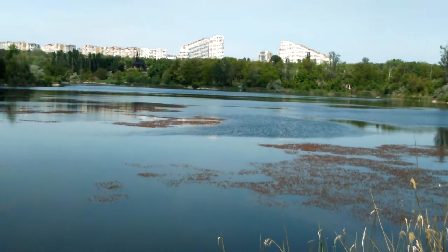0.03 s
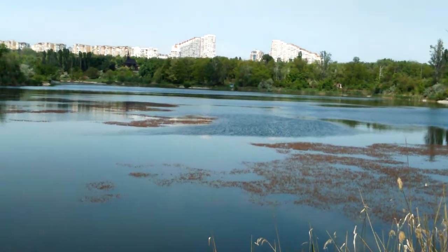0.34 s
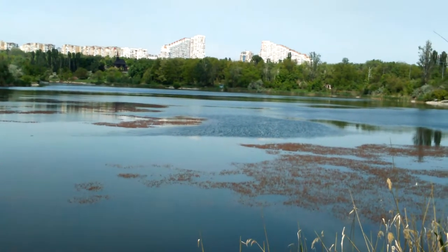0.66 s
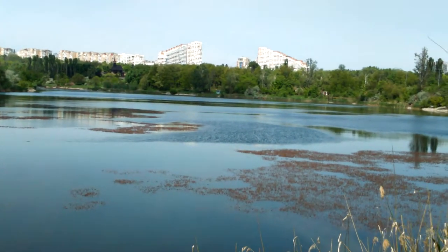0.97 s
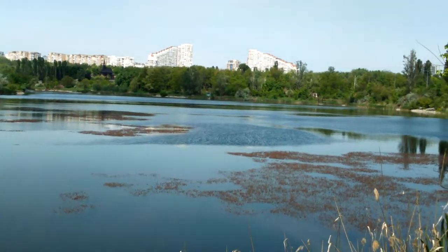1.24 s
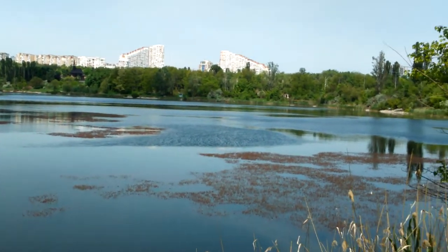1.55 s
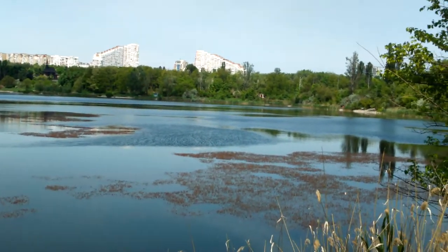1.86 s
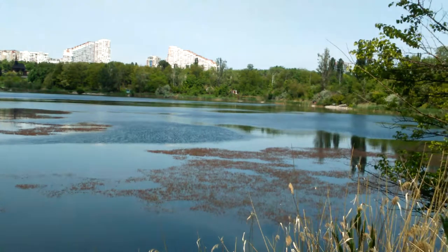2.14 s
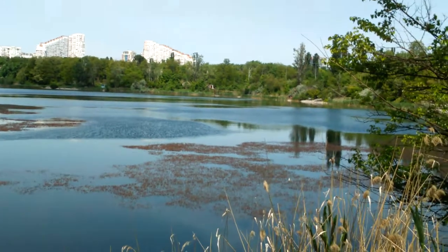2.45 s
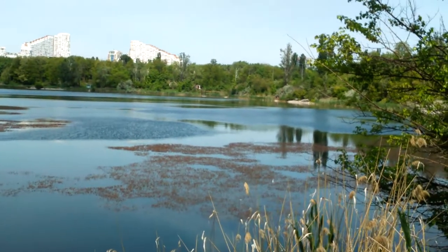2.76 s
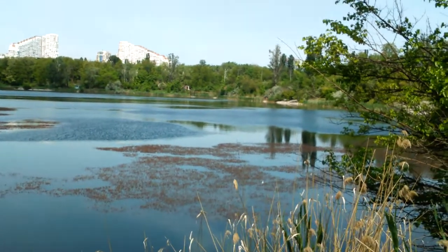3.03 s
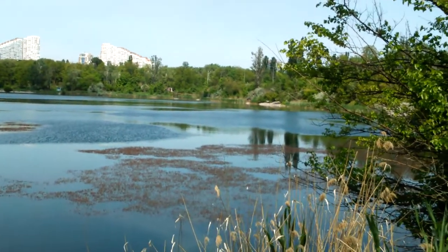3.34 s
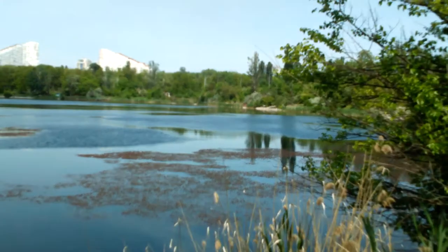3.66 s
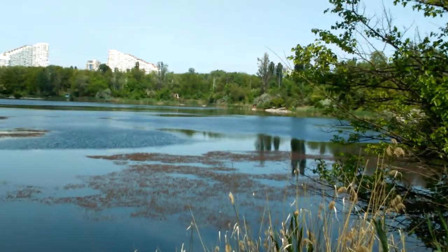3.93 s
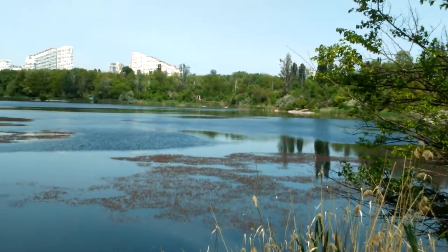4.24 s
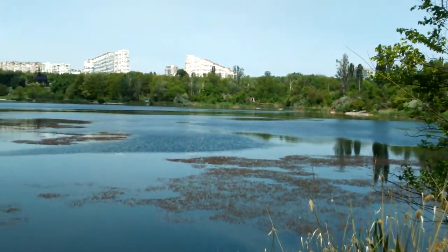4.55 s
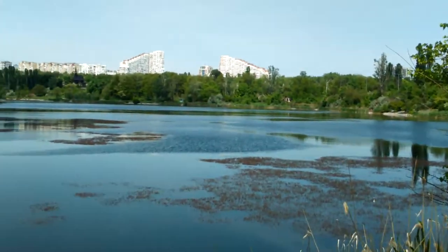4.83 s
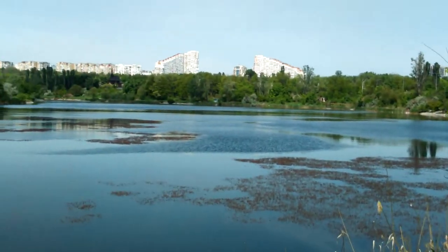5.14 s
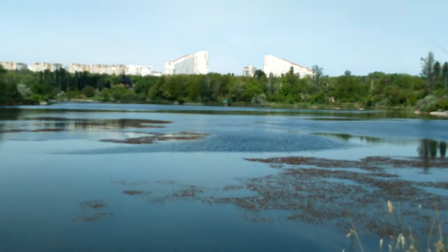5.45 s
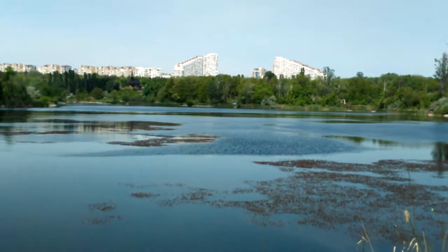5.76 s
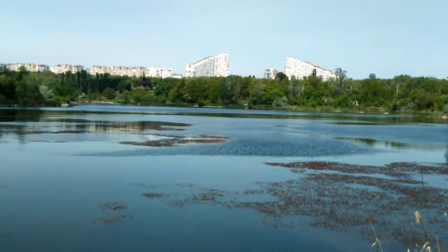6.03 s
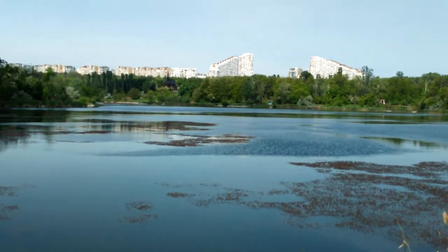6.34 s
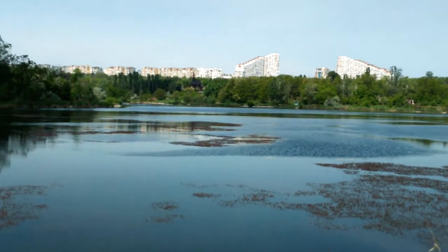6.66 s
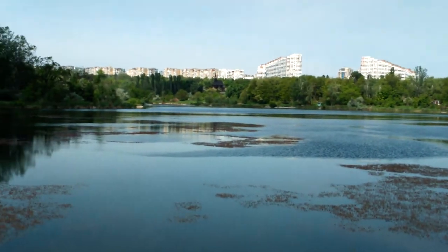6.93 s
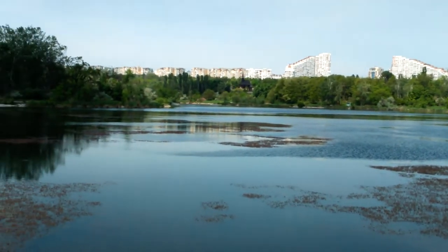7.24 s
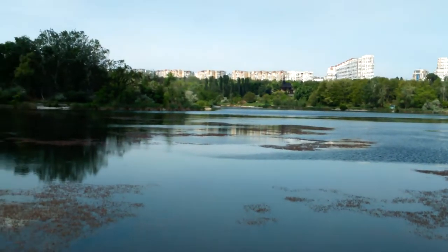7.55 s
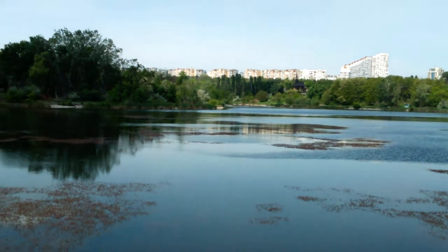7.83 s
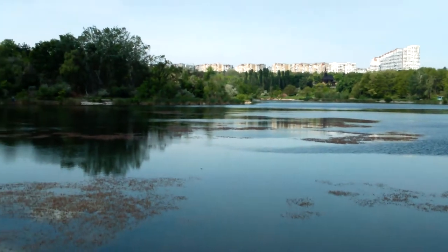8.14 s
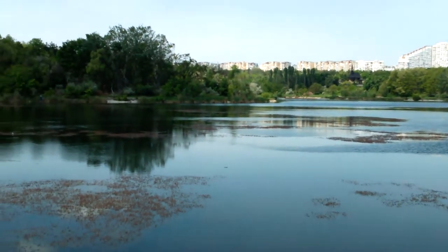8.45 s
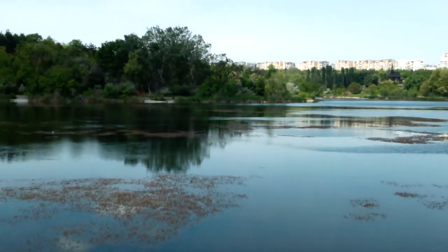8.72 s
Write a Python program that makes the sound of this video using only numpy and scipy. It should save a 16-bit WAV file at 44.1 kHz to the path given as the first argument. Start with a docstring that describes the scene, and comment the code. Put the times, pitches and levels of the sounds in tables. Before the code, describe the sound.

Many frogs cackle in overlapping bursts, near and far, beside a lake, over soft hiss and a low rumble of breeze on the microphone.

```python
"""The reedy shore of a lake: marsh frogs cackle near and far, their series of short croaks overlapping.
Each croak is a buzz of the vocal cords that slides down and breaks up, rung by the vocal sacs; the banks
echo it. Peeps, longer quacks and a small frog's thin rasps fall in between. Behind them lie a distant
chorus, the drone of a town and a soft hiss; a breeze buffets the microphone."""
import sys
import numpy as np
from scipy import signal
from scipy.fft import rfft, irfft
from scipy.io import wavfile

SR = 44100
rng = np.random.default_rng(int(sys.argv[2]) if len(sys.argv) > 2 else 0)


def materialize(psi):
    """Save the field psi as 16-bit PCM at rate SR to the path in sys.argv[1].

    A 1-D psi becomes a single channel; in a 2-D psi each row is a channel.
    """
    bounded = np.clip(np.atleast_2d(psi).T, -1, 1)
    quanta = np.round(bounded * 32767).astype(np.int16)
    wavfile.write(sys.argv[1], SR, quanta)


N = 396459
TIME = np.arange(N) / SR
TOP_HZ = 15700
# the distant chorus drops back for a moment before the last outburst (0-1)
LULL = np.exp(-((TIME - 8.32) / 0.28) ** 2)


def undb(db):
    """Decibels to gain."""
    return 10 ** (np.asarray(db) / 20)


def unit(x):
    """Scale to rms 1."""
    return x / np.sqrt(np.mean(x ** 2))


def add(out, s, x):
    """Mix x into out from time s."""
    i = max(int(s * SR), 0)
    out[i:i + len(x)] += x[:max(len(out) - i, 0)]


def wander(t, rate):
    """Random drift: rate values a second, joined by lines."""
    return np.interp(t * rate, np.arange(4096), rng.standard_normal(4096))


def noise(points):
    """Noise of rms 1, coloured by (frequency [Hz], level [dB]) points and rolled off beyond them."""
    hz, db = np.transpose(points)
    f = np.maximum(np.arange(N // 2 + 1) * SR / N, 1)
    edges = 1 / (1 + (hz[0] / f / 2) ** 4) / (1 + (f / hz[-1] / 2) ** 4)
    colour = undb(np.interp(np.log(f), np.log(hz), db))
    return unit(irfft(rfft(rng.standard_normal(N)) * edges * colour, N))


def resonance(f, hz, width):
    """Complex response at f of a ringing resonance, 1 at its centre."""
    return 1 / (1 + 1j * (f / hz - hz / f) * hz / width)


def background(drone_db=-38, shore_db=-50, hiss_trim_db=2, lull_db=-4):
    """The bed: the town's low drone, the blurred murmur of the far shore and a soft hiss."""
    # colours of the three noises: (frequency [Hz], relative level [dB])
    drone_colour = [(20, -26), (33, -21.5), (43, -4), (51, 5), (60, -7), (90, -15.5), (160, -33),
                    (300, -42)]
    shore_colour = [(150, -17.5), (300, -0.5), (410, 2.5), (580, -5.5), (750, -1.5), (950, -4), (1400, -4),
                    (2000, 1), (2600, -9.5), (3600, -17), (5000, -25), (8000, -37.5)]
    hiss_colour = [(1000, 11.5), (3000, -14.5), (5200, -0.5), (6400, 2.5), (8000, -2.5), (10500, -6.5),
                   (12500, -9.5), (15500, -10)]
    # slow fader ride on the hiss: (time [s], level [dB])
    hiss_ride = [(0.0, -62.5), (2.0, -64), (8.99, -61)]
    drone = noise(drone_colour) * undb(drone_db)
    shore = noise(shore_colour) * undb(shore_db + wander(TIME, 9) + lull_db * LULL)
    hiss = noise(hiss_colour) * undb(np.interp(TIME, *np.transpose(hiss_ride)) + hiss_trim_db)
    return drone + shore + hiss


def breeze(gust_trim_db=-1, flutter_db=1, bump_trim_db=1, bump_s=.0071, swirl_db=-8, swirl_s=.021):
    """Gusts rumble and flutter on the microphone; eddies hit it with short bumps in a swirl of noise."""
    # swell of the gusts: (time [s], level [dB])
    gusts = [(0.0, -38), (0.05, -38), (0.12, -43), (0.3, -30.5), (0.4, -42), (1.08, -35.5), (1.1, -30),
             (1.23, -45), (1.28, -32), (1.35, -39), (1.45, -29), (1.5, -37.5), (2.05, -31), (2.13, -38.5),
             (2.43, -30), (2.73, -38.5), (2.85, -29.5), (3.73, -41.5), (3.78, -31), (3.83, -32),
             (4.58, -34), (4.63, -36), (5.03, -33.5), (5.41, -36.5), (5.56, -29.5), (5.61, -38),
             (5.71, -32.5), (5.83, -39), (6.66, -42), (6.68, -31.5), (6.74, -38), (6.89, -26), (6.93, -47),
             (7.06, -31), (7.68, -37.5), (7.76, -28.5), (7.94, -37.5), (8.29, -39.5), (8.31, -33),
             (8.41, -47), (8.46, -35), (8.71, -33.5), (8.94, -44), (8.99, -29)]
    # colours of the rumble and the swirl: (frequency [Hz], relative level [dB])
    rumble_colour = [(35, -27.5), (50, 0.5), (70, 2), (100, -3.5), (140, -10.5), (200, -20), (300, -31),
                     (500, -60)]
    swirl_colour = [(70, -33.5), (120, -3), (170, 10), (230, -0.5), (310, -10), (450, -24.5), (900, -50)]
    # eddies hitting the microphone: (time [s], level [dB], pitch [Hz])
    bumps = [(0.855, -33, 167), (1.135, -33.4, 139), (1.751, -30.5, 150), (1.973, -35.5, 137),
             (2.036, -35, 132), (2.373, -33, 154), (2.456, -35, 154), (2.507, -32, 140), (2.979, -33, 149),
             (3.045, -32.3, 185), (4.001, -27, 200), (4.12, -33, 205), (4.857, -30.5, 160),
             (4.993, -31.5, 158), (5.34, -29.5, 200), (6.871, -34.5, 143), (7.245, -32.5, 154),
             (7.296, -33.5, 152), (7.757, -34, 154)]
    gust_db = np.interp(TIME, *np.transpose(gusts)) + gust_trim_db
    buffet = noise(rumble_colour) * undb(gust_db + flutter_db * wander(TIME, 10))
    t = TIME[:SR // 10] - .05
    bump_envelope = np.hanning(len(t)) / (1 + (t / bump_s) ** 2)
    for s, db, hz in bumps:
        bump = np.cos(2 * np.pi * (hz * t + rng.random())) * bump_envelope
        add(buffet, s + t[0], undb(db + bump_trim_db) * bump)
    swirl = sum(undb(db + swirl_db) / (1 + ((TIME - s) / swirl_s) ** 2) for s, db, _ in bumps)
    return buffet + noise(swirl_colour) * swirl


def banks(x, reeds_db=-13, reeds_t60=.19, trees_db=-15, trees_t60=.7, dull_hz=2500):
    """The reed bed scatters the calls, and the trees return a long, duller tail."""
    t = TIME[:SR]
    reeds, trees = rng.standard_normal((2, SR))
    reeds = reeds * undb(-60 * t / reeds_t60) * (1 - np.exp(-t / .007))
    trees = trees * undb(-60 * t / trees_t60) * (1 - np.exp(-t / .15))
    trees = signal.sosfilt(signal.butter(2, dull_hz, fs=SR, output="sos"), unit(trees))
    response = undb(reeds_db) * unit(reeds) + undb(trees_db) * trees
    return signal.fftconvolve(x, response / np.sqrt(SR))[:N]


def stems(x, scatter_db=-5, spread_s=.002):
    """Stems round a frog blur its pulses, differently for every call."""
    t = TIME[:1024]
    scatter = unit(rng.standard_normal(len(t)) * t * np.exp(-t / spread_s))
    response = undb(scatter_db) * scatter / np.sqrt(len(t))
    response[0] = 1  # the direct path
    return signal.fftconvolve(x, response)


def cords(t, pitch, rough, jitter=.055, shimmer=.3):
    """Pulses of the vocal cords, all harmonics equally strong; uneven cycles roughen them."""
    cycles = np.cumsum(pitch * (1 + jitter * rough * wander(t, 448))) / SR
    order = np.arange(1, 31)[:, None]
    pulses = np.sum((order * pitch < TOP_HZ) * np.cos(2 * np.pi * order * cycles), axis=0)
    return pulses * (1 + shimmer * rough * wander(t, 312))


def throat(pulses, sac_hz, body_db, mouth_db, mouth_hz,
           overtone_db=-30, lower_sac_db=-24, belly_db=-12, sac_share=1):
    """The pulses ring the vocal sacs, two body resonances below and two mouth resonances above."""
    size = 8192
    f = np.maximum(np.arange(size // 2 + 1) * SR / size, 1)
    hollow = 1 - .4 * resonance(f, 1565, 125)  # a scoop between the sacs' low and high ringing
    main_sac = resonance(f, sac_hz, 250) * resonance(f, sac_hz, 1020) * hollow
    lower_sac = undb(lower_sac_db) * resonance(f, 1730, 190) * resonance(f, 1730, 1020)
    skirt = 1 / np.sqrt(1 + (f / sac_hz / 1.17) ** 16)  # the sacs pass little above their own pitch
    rasp = undb(-23.5) * resonance(f, 2760, 800) ** 2
    sacs = (main_sac - lower_sac) * skirt - rasp
    belly = undb(belly_db) * resonance(f, 437, 240) ** 2
    body = resonance(f, 1046, 290) * resonance(f, 1046, 520) + belly
    lower_mouth = undb(-1) * resonance(f, .835 * mouth_hz, 425) ** 2
    mouth = resonance(f, mouth_hz, 340) ** 2 + lower_mouth
    # above the mouth resonances only one faint overtone gets out
    ceiling = 1 / (1 + (f / mouth_hz / 1.12) ** 20)
    overtone = undb(overtone_db) * resonance(f, 10400, 1700) ** 3
    source = rfft(stems(pulses), size)

    def ring(response):
        return unit(irfft(source * response, size)) * np.sqrt(len(pulses) / size)

    return (sac_share * ring(sacs * ceiling)
            + undb(body_db) * ring(body * ceiling)
            + undb(mouth_db) * ring(mouth * ceiling + overtone))


def croak(length, pitch_hz, glide, rough_end, tone_db, sac_hz, body_db, mouth_db, mouth_hz,
          whistle_db=-20, peak_skew=.52, rough_start=.2, **timbre):
    """One push of air: the cords slacken and roughen; the sacs sing under a thin, falling whistle."""
    t = np.arange(int(length * SR)) / SR
    progress = t / t[-1]
    slack_octaves = .25 * np.maximum(progress - 1 / 3, 0)
    pitch = pitch_hz * 2 ** (glide * (t - t[-1] / 4) - slack_octaves)
    rough = rough_start + (rough_end - rough_start) * progress ** 1.5
    # the air comes in a few quick puffs within each croak
    rattle = 1 + .25 * np.cos(2 * np.pi * 103 * rng.uniform(.6, 1.1) * t)
    push = np.abs(np.sin(np.pi * progress ** peak_skew)) ** 1.6 * rattle
    arch = 1 - .07 * (4 * (progress - .4) ** 2 - .1)
    tone_hz = sac_hz * (arch + .025 * rough * wander(t, 403))
    tone = undb(tone_db) * unit(push * np.sin(2 * np.pi * np.cumsum(tone_hz) / SR))
    whistle_hz = mouth_hz * 2 ** (-1.8 * (t - t[-1] / 3)) * (1 + .012 * wander(t, 400))
    whistle = unit(np.sqrt(push) * np.sin(2 * np.pi * np.cumsum(whistle_hz) / SR))
    # equal-power blends: buzz with tone in the sacs, buzz with whistle in the mouth
    sac_share = 1 / np.hypot(1, undb(tone_db))
    buzz_db = mouth_db - 20 * np.log10(np.hypot(1, undb(whistle_db)))
    pulses = push * cords(t, pitch, rough)
    voice = throat(pulses, sac_hz, body_db, buzz_db, mouth_hz, sac_share=sac_share, **timbre)
    add(voice, 0, sac_share * tone + undb(buzz_db + whistle_db) * whistle)
    return voice


def far_frogs(count=36, nearest_db=-50.5, spread_db=4.5, lull_db=-9):
    """Frogs across the water take turns, each swelling and fading through seven croaks of its own."""
    out = np.zeros(N)
    duration = N / SR
    for turn, (start, height, slowness, near) in enumerate(rng.random((count, 4))):
        note = croak(length=.076, pitch_hz=380 + 150 * height, glide=-11, rough_end=1.62, tone_db=-4,
                     sac_hz=1150 + 900 * height, body_db=-8, mouth_db=-25, mouth_hz=4700)
        onset = (turn + start) / count * duration
        gap = .088 * (.78 + .37 * slowness)
        gain = undb(nearest_db + spread_db * (near - 1))
        for k, swell in enumerate(np.hanning(9)[1:-1]):
            add(out, (onset + k * gap) % duration, note * swell * gain)
    return out * undb(lull_db * LULL)


def rasps():
    """A small frog keeps up even series of thin, high croaks, rough from the start."""
    # its series: (start [s], gap [s], count, level [dB], sac resonance [Hz])
    series = [(.073, .0872, 9, -52, 2585), (1.291, .101, 5, -54.5, 2605), (1.991, .091, 3, -52, 2610),
              (2.258, .0888, 4, -51, 2675), (5.766, .102, 2, -52, 2255), (6.841, .099, 5, -57, 2705)]
    out = np.zeros(N)
    for start, gap, count, db, sac_hz in series:
        for k in range(count):
            note = croak(length=.05, pitch_hz=530, glide=-7, rough_end=2.8, tone_db=-8, sac_hz=sac_hz,
                         body_db=-24, mouth_db=-24, mouth_hz=3900, rough_start=1.2, peak_skew=.8)
            add(out, start + k * gap, undb(db) * note)
    return out


def quacks(arch_octaves=.2975, trim_db=-.5):
    """Drawn-out, grainy calls: the pitch of the cords rises and falls with the push of air."""
    # quacks: (time [s], length [s], level [dB], top pitch [Hz], sac resonance [Hz],
    # body resonance [dB], mouth resonances [dB])
    calls = [(.084, .076, -41.2, 412, 1215, -7.5, -27.5), (.134, .062, -42.3, 468, 1505, -5.5, -19.5),
             (1.093, .047, -37.4, 432, 1255, -10.5, -28.5), (1.141, .046, -42.4, 442, 1755, -1.5, -23.5),
             (1.186, .074, -42.2, 392, 1945, -4.5, -26.5), (2.617, .073, -34.3, 456, 1900, -5, -23),
             (2.701, .044, -37.2, 462, 1425, -6.6, -24.5), (2.749, .041, -39.3, 422, 1705, -8.5, -27.6)]
    out = np.zeros(N)
    for s, length, db, pitch, sac_hz, body_db, mouth_db in calls:
        t = np.arange(int(length * SR)) / SR
        push = np.sqrt(np.sin(np.pi * t / length))
        pulses = push * cords(t, pitch * 2 ** (arch_octaves * (push ** 2 - 1)), rough=1.5)
        note = throat(pulses, sac_hz, body_db, mouth_db, mouth_hz=4750, belly_db=-6)
        add(out, s, undb(db + trim_db) * note)
    return out


def peep(hz, length=.028, octaves_per_s=-5, octave_db=-21):
    """A short, nearly pure note of the sacs that sags a little."""
    t = np.arange(int(length * SR)) / SR - length / 2
    phase = 2 * np.pi * np.cumsum(hz * 2 ** (octaves_per_s * t)) / SR
    return np.hanning(len(t)) * (np.sin(phase) + undb(octave_db) * np.sin(2 * phase))


def cackles(croak_trim_db=-.3, peep_trim_db=-1, full_sac_hz=2090, pitch_scatter=.018, glide_scatter=.18):
    """The croaks and peeps of the nearer frogs; returns the direct sound and the send to the banks."""
    # each frog's voice: (croak length [s], usual pitch [Hz], usual glide [octaves/s], final roughness,
    # pure sac tone [dB], mouth resonance on full sacs [Hz], overtone [dB], lower sac resonance [dB],
    # whistle over the mouth's buzz [dB], echo send [dB])
    voices = {"near": (.047, 519, -20, 1.7, -5, 4860, -23, -11, -11, -3),
              "throaty": (.049, 495, -21, 1.6, -3, 4800, -35, -12, -18, -1),
              "middle": (.048, 525, -10, 1.5, 1.5, 4450, -36, -24, -10, -1),
              "hoarse": (.06, 485, -12, 2.4, -5, 4520, -36, -14, -7, 2),
              "husky": (.063, 445, -15, 2.1, -6, 4200, -36, -24, -9, 0),
              "clear": (.043, 575, -5, 1.6, 1, 4950, -35, -24, -15, -1),
              "deep": (.056, 470, -12, 2.2, -3, 4190, -38, -13, 0, 0)}
    # each frog's croaks; a series tends to slow, sink and fade as the frog tires:
    # (time [s], level [dB], sac resonance [Hz], body resonance [dB], mouth resonances [dB])
    croaks = {"near": [(4.822, -32.5, 2030, -13.5, -20), (4.888, -31.75, 2073, -13, -18.5),
              (4.969, -28.55, 2043, -16, -20.5), (5.057, -28.75, 1673, -14, -29),
              (5.137, -37.75, 1813, -6.6, -25.3), (6.14, -30.65, 2093, -17, -21),
              (6.213, -28.35, 2183, -19, -21.5), (6.296, -27.8, 1743, -18, -27),
              (6.389, -31.3, 1663, -15, -27.5), (7.365, -30.35, 2123, -17, -22.5),
              (7.44, -26.3, 2173, -21.5, -24), (7.523, -28.8, 2083, -18.5, -21.5),
              (7.615, -28.75, 1713, -15, -28), (8.685, -30.8, 2133, -17, -25.5),
              (8.764, -29.65, 2223, -19, -23), (8.849, -31, 1893, -17, -23), (8.94, -30.8, 1743, -15, -27)],
              "throaty": [(3.668, -32.3, 1963, -13.6, -24.8), (3.73, -29.95, 1983, -13.6, -25.8),
              (3.806, -35.95, 1783, -5.6, -23.8), (3.885, -39.95, 1773, -0.6, -23.8)],
              "middle": [(0.159, -39.55, 1953, -6.6, -18.8), (0.229, -36.2, 2143, -18, -18.5),
              (0.315, -35.15, 2153, -16, -18), (0.399, -39.15, 2063, -20.6, -14.8),
              (0.482, -46.85, 1753, -12.6, -12.8), (1.381, -42.55, 2103, -10.6, -16.8),
              (1.46, -36.05, 2103, -20.6, -19.8), (1.545, -37.45, 2033, -23.6, -20.8),
              (1.631, -38.65, 1913, -9.6, -20.8), (1.717, -47.95, 1773, -4.6, -15.8),
              (2.802, -39.95, 2023, -13.6, -20.8), (2.883, -35.55, 2103, -22.6, -23.8),
              (2.965, -33.95, 2183, -27.6, -22.8), (3.049, -37.45, 2003, -4.6, -19.8),
              (4.011, -41.45, 2063, -16.6, -17.8), (4.094, -36.25, 2113, -20.6, -18.8),
              (4.178, -34.25, 2063, -9, -20.8), (4.269, -38.95, 2073, -6, -16), (4.359, -45, 1863, -5, -14),
              (8.725, -42, 2000, -16, -22), (8.81, -43, 2030, -16, -18), (8.917, -39, 2100, -16, -17)],
              "hoarse": [(5.22, -39.85, 1983, -15.6, -15.8), (5.301, -37.05, 2083, -13.6, -15.8),
              (5.384, -38, 2100, -14, -15), (5.468, -37.5, 2040, -14, -15), (6.483, -40, 2040, -14, -17.5),
              (6.566, -38, 2000, -16, -18), (6.656, -40, 1950, -14, -18), (7.686, -39, 1900, -8, -17),
              (7.75, -37.5, 2090, -15, -17), (7.83, -38.5, 2093, -14, -16), (7.914, -41, 1963, -11, -16),
              (8.003, -46, 1700, -12, -15)], "husky": [(0.544, -43.55, 1653, -4.6, -21.8),
              (0.631, -39.65, 1783, -4.6, -19.8), (0.719, -40.35, 1713, -6.6, -17.8),
              (0.802, -42.05, 1173, -16.6, -22.8), (1.944, -38.75, 1753, -5.5, -20.5),
              (2.027, -39.5, 1800, -12, -20), (2.116, -37.85, 1803, -7, -23),
              (2.202, -36.75, 1753, -11, -25.8), (3.193, -38, 1773, -9, -21),
              (3.278, -36.5, 1733, -10, -21), (4.459, -41.05, 1783, -7.6, -17.8),
              (4.552, -39.75, 1663, -16.6, -19.8)], "clear": [(0.912, -39.65, 1833, -14.6, -21.8),
              (0.995, -34.65, 1853, -10.6, -28.8), (1.076, -37.25, 1743, -7, -27.8),
              (1.314, -47.15, 1653, -3.6, -25.8), (1.884, -43.75, 1693, -10.6, -25.8),
              (3.384, -40.65, 1793, -10.6, -23.8), (3.466, -40.55, 1723, -10.6, -19.8),
              (3.552, -35.3, 1793, -23.6, -29.8), (4.604, -40.65, 2153, -12.6, -25.8),
              (4.679, -41.65, 2093, -9.6, -21.8), (4.769, -37.95, 1753, -22.6, -26.8),
              (7.074, -51.75, 1723, -12.6, -19.8), (7.175, -46.75, 1643, -16.6, -23.8),
              (7.273, -44.65, 1613, -19.6, -23.8), (8.539, -46.95, 2053, -13.6, -21.8),
              (8.624, -41.65, 2103, -19.6, -22.8)], "deep": [(0.364, -49.55, 1393, -11.6, -22.8),
              (0.956, -46.85, 1343, -17.6, -22.8), (1.624, -47.35, 1543, -8.6, -22.8),
              (1.943, -43, 1230, -8, -26), (2.033, -40.5, 1400, -14, -24), (3.135, -38.5, 1460, -10, -17),
              (3.217, -40.35, 1373, -12, -17), (3.307, -42.15, 1153, -31.6, -19),
              (4.192, -43.35, 1413, -7.6, -22.8), (4.277, -40.65, 1393, -10.6, -22.8),
              (4.366, -41.5, 1410, -12, -20), (4.659, -46.25, 1353, -14.6, -22.8),
              (5.364, -41.85, 1403, -7.6, -22.8), (5.446, -39.5, 1453, -9.6, -20),
              (5.538, -39, 1423, -12, -17), (5.624, -46.5, 1413, -3, -18), (6.462, -39.5, 1793, -7, -25),
              (6.546, -40, 1470, -6, -22), (6.629, -39.5, 1493, -9, -18), (6.717, -38.5, 1430, -12, -14),
              (6.791, -40.5, 1683, -7, -15), (6.876, -48, 1633, -9, -22),
              (6.924, -49.65, 1413, -10.6, -22.8), (6.974, -47.75, 1653, -14.6, -25.8),
              (7.704, -40, 1480, -6, -14), (7.786, -37, 1423, -14, -17), (7.866, -42, 1433, -8, -15),
              (7.942, -44, 1640, -13, -18), (8.234, -51.05, 1513, -11.6, -23.8),
              (8.279, -47.95, 1433, -15.6, -26.8), (8.325, -46.75, 1653, -13.6, -26.8),
              (8.722, -41, 1450, -7, -21), (8.808, -39, 1483, -11, -16), (8.896, -39, 1443, -12, -15),
              (8.972, -42, 1450, -11, -17)]}
    # peeps of full sacs just before the cords open: (time [s], level [dB], pitch [Hz])
    peeps = [(.197, -33.5, 1865), (2.836, -34.5, 2005), (2.929, -37.5, 1855), (3.641, -35.5, 1655),
             (3.713, -35.4, 1985), (3.941, -40.5, 1565), (3.976, -36.5, 1955), (4.067, -33.2, 2010),
             (4.151, -37.6, 1605), (4.857, -32.5, 1620), (4.873, -28.5, 1925), (4.96, -29, 1935),
             (5.334, -32, 2010), (6.194, -28.6, 2105), (7.509, -30.4, 1995), (8.753, -30.6, 2055)]
    direct, send = np.zeros((2, N))
    for frog, rows in croaks.items():
        (length, pitch, glide, rough, tone_db, mouth_hz,
         overtone_db, lower_sac_db, whistle_db, echo_db) = voices[frog]
        for s, db, sac_hz, body_db, mouth_db in rows:
            # the cords lock one of their harmonics onto the sac resonance
            locked_hz = sac_hz / round(sac_hz / pitch) * rng.normal(1, pitch_scatter)
            # as the sacs empty, the glide flattens and the mouth resonances sink
            fullness = sac_hz / full_sac_hz
            slide = glide * fullness ** 1.2 * rng.normal(1, glide_scatter)
            sunk_hz = mouth_hz * fullness ** .03
            note = croak(length, locked_hz, slide, rough, tone_db, sac_hz, body_db, mouth_db, sunk_hz,
                         whistle_db=whistle_db, overtone_db=overtone_db, lower_sac_db=lower_sac_db)
            note *= undb(db + croak_trim_db)
            add(direct, s, note)
            add(send, s, undb(echo_db) * note)
    for s, db, hz in peeps:
        add(direct, s, undb(db + peep_trim_db) * peep(hz))
    return direct, send


def scene():
    """Frogs and their echoes over breeze and background, in mono."""
    bed = breeze() + background()
    near_frogs, send = cackles()
    other_frogs = quacks() + rasps() + far_frogs()
    return (near_frogs + other_frogs + banks(send + other_frogs) + bed)[None]


def record(dry):
    """A steep low-pass cuts the very top."""
    return signal.sosfilt(signal.ellip(10, .2, 80, TOP_HZ, fs=SR, output="sos"), dry)


dry = scene()
out = record(dry)
materialize(out)
```